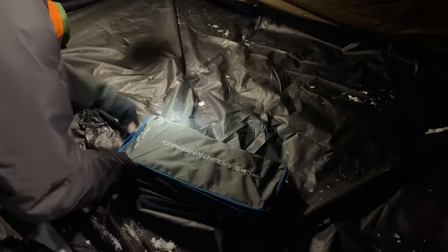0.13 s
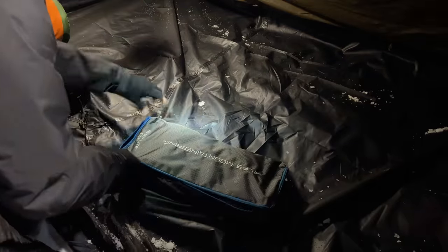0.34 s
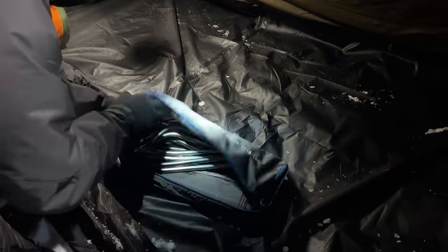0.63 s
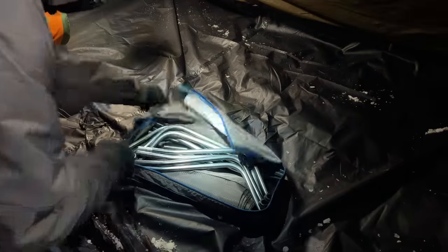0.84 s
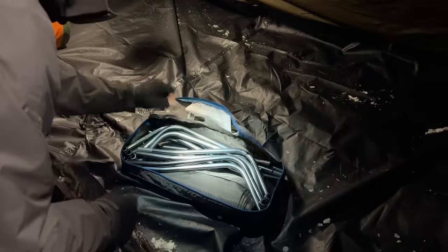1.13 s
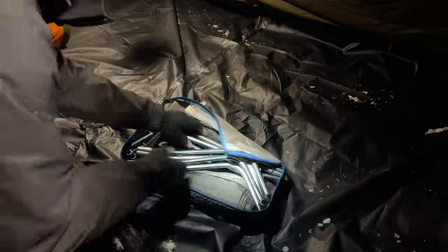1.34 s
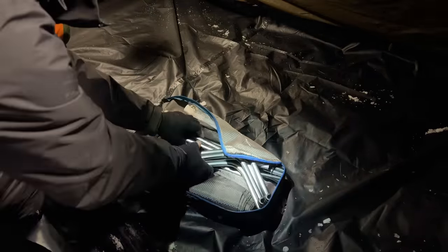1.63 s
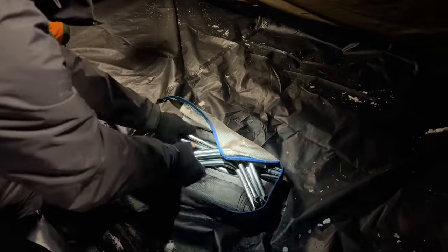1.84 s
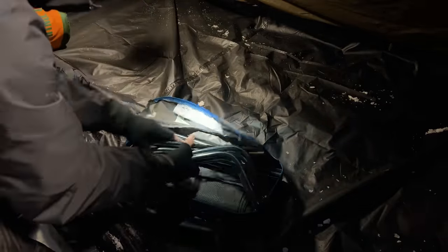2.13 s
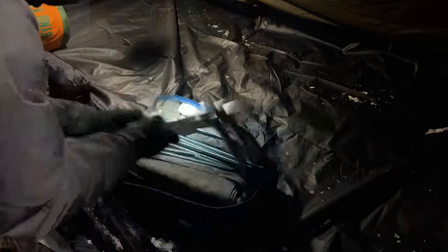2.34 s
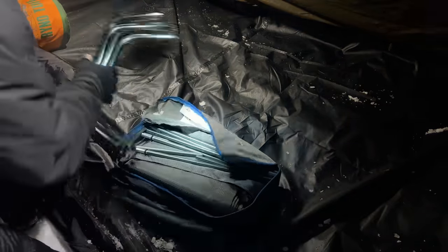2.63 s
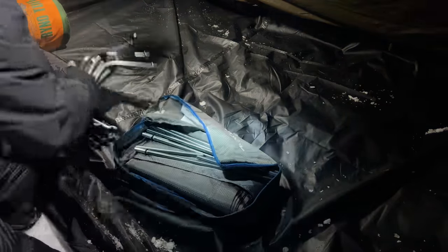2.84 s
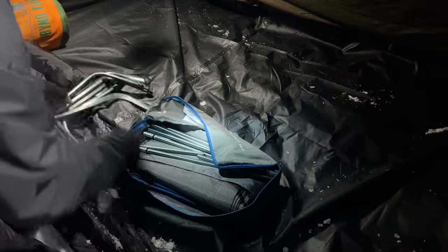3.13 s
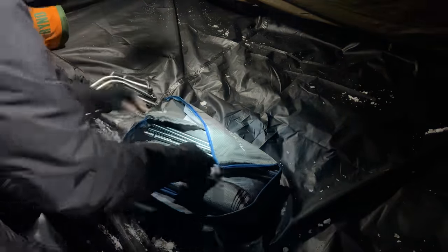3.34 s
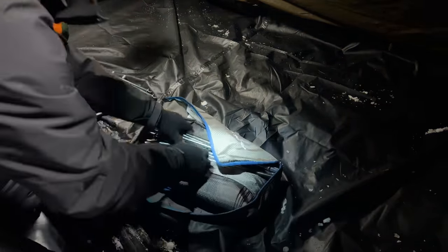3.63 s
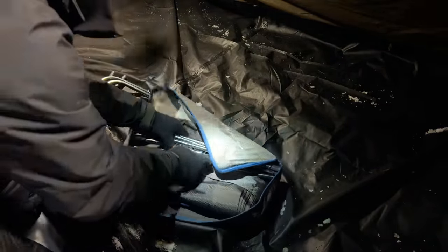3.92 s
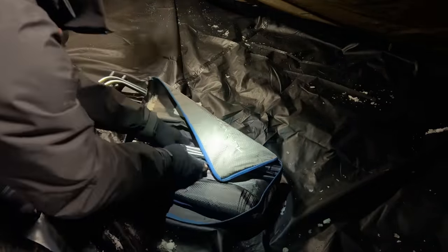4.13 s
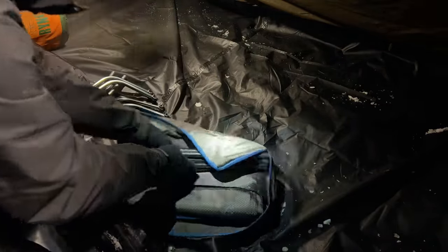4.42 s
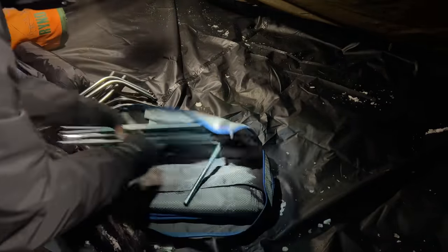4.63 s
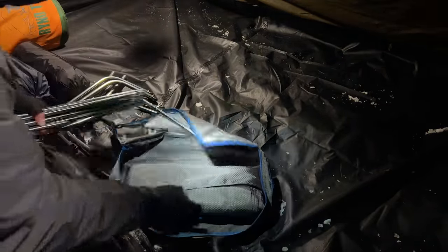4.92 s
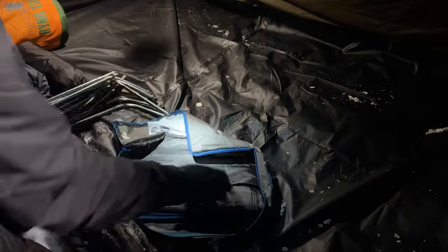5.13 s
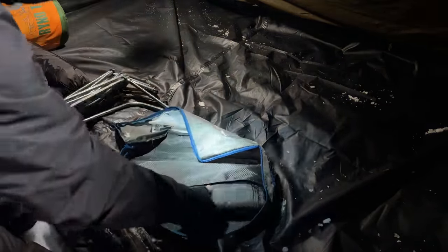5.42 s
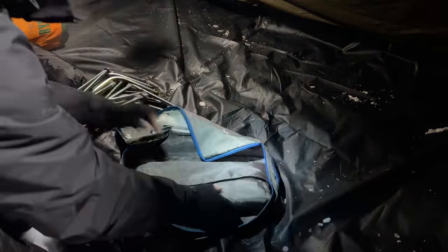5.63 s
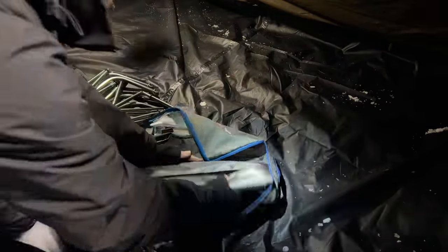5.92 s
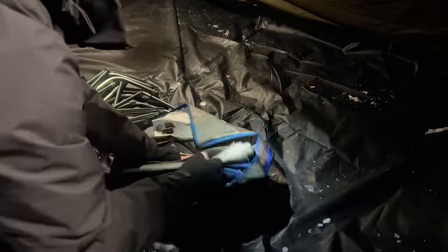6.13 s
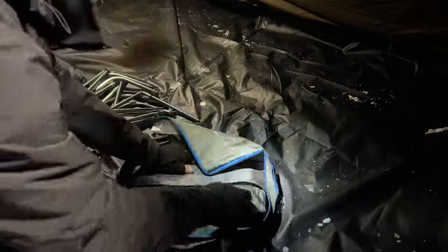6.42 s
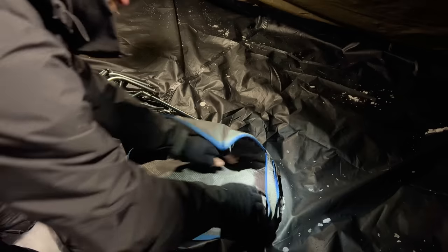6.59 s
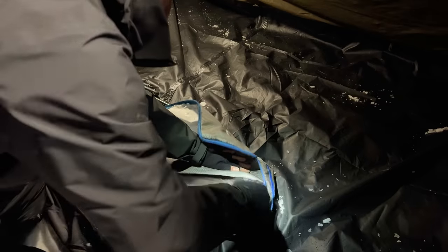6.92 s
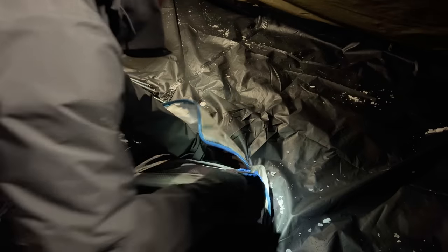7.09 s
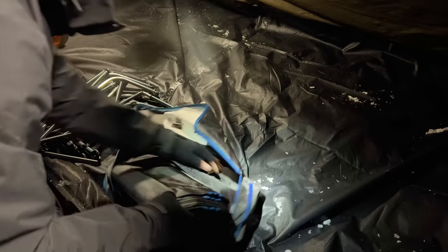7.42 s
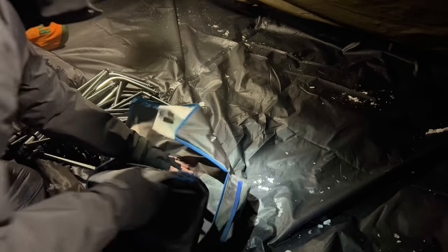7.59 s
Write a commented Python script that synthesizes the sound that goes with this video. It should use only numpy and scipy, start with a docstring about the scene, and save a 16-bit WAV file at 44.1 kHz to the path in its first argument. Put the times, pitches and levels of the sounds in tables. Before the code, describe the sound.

Close, dry handling of camping gear inside a tent. A brief zippy sleeve swish and nylon rustle, a bag flap snapping open, then bent metal poles clattering in a bright cluster. Straight poles follow with sharper clinks and short scraping slides. Finally the stiff fabric bag is crumpled, crackling louder and louder to the end. Faint low air and soft groundsheet thumps lie underneath.

```python
"""Gathering tent poles

Someone in a nylon jacket kneels on a groundsheet, opens a fabric bag and gathers metal tent poles from it.
Cloth is friction noise plus buckling creases; a swishing sleeve is a tone at the rate its ribs pass.
Bent poles, then straight ones, clatter as contact noise plus decaying bending modes; stiff cloth crackles.
A phone close by colours the sound and limits the loudest clinks.
"""
import sys
import numpy as np
from scipy import signal
from scipy.fft import rfft, irfft
from scipy.io import wavfile
from scipy.ndimage import uniform_filter1d, minimum_filter1d

SR = 44100
rng = np.random.default_rng(int(sys.argv[2]) if len(sys.argv) > 2 else 0)


def master_out(mix):
    """Clip the mix to full scale and print it as 16-bit PCM to the path in sys.argv[1]."""
    frames = np.transpose(np.atleast_2d(mix))
    ceiling = np.clip(frames, -1, 1)
    pcm = np.round(ceiling * 32767).astype(np.int16)
    wavfile.write(sys.argv[1], SR, pcm)


N = 341775
TIME = np.arange(N) / SR  # s


def undb(db):
    """Level law: decibels to amplitude gain."""
    return 10 ** (np.asarray(db) / 20)


def unit(x, size=None):
    """Normalisation: scale to rms 1 over the first size samples."""
    return x / np.sqrt(np.mean(x[:size] ** 2) + 1e-18)


def add(track, s, sound):
    """Superposition: mix a sound in at time s."""
    i = max(int(s * SR), 0)
    track[i:i + len(sound)] += sound[:max(N - i, 0)]


def band(x, lo_hz, hi_hz, order=2):
    """Resonant selection: a causal band-pass, its upper edge kept below half the sample rate."""
    edges = [lo_hz, min(hi_hz, .48 * SR)]
    return signal.sosfilt(signal.butter(order, edges, "band", fs=SR, output="sos"), x)


def response(points, size=1024):
    """Minimum phase: the causal impulse response of a (Hz, dB) colour, by way of the cepstrum."""
    hz, db = np.transpose(points)
    grid = np.arange(size // 2 + 1) * SR / size + 1  # 1 Hz up, to keep the logarithm finite
    cepstrum = irfft(np.log(undb(np.interp(np.log(grid), np.log(hz), db))))
    # fold the backward half onto the forward half
    cepstrum[1:size // 2] *= 2
    cepstrum[size // 2 + 1:] = 0
    return irfft(np.exp(rfft(cepstrum)))


def colour(x, points):
    """Spectral shaping: colour white sound and keep its power."""
    h = response(points)
    return signal.fftconvolve(x, h / np.sqrt(np.sum(h ** 2)))[:len(x)]


def walk(rate):
    """Random modulation: smooth chance of rms 1 that changes rate times a second."""
    k = max(int(SR / rate), 1)
    steps = np.repeat(rng.standard_normal(N // k + 1), k)
    return unit(uniform_filter1d(steps, k)[:N])


def speckled(size, spread_db, width_hz):
    """Modal crowding: noise with chance resonances, the many weak modes one point of contact wakes."""
    hz = np.arange(size // 2 + 1) * SR / size
    peaks_db = spread_db * np.interp(hz / width_hz, np.arange(600), rng.standard_normal(600))
    return unit(irfft(undb(peaks_db) * np.exp(2j * np.pi * rng.random(len(hz)))))


def buckles(rate, spread_db):
    """Buckling: tiny creases give way at random, with many weak clicks and a few strong ones."""
    size = undb(spread_db * np.minimum(rng.exponential(size=N), 4))
    clicks = (rng.random(N) < rate / SR) * size * rng.choice([-1, 1], N)
    return clicks / np.sqrt(uniform_filter1d(clicks ** 2, size=3000) + 1e-9)  # even out the local power


STROKE_RANGE_DB = 20.5  # a movement falls this far (dB) over its rise and fall times
STROKE_SHAPE = 1.28  # exponent; above 1 its top is rounder


def swell(peak_s, rise_s, fall_s):
    """Energy envelope: the power of one movement builds up to its peak and dies away."""
    coarse = TIME[::32]
    before = (peak_s - coarse) / max(rise_s, .005)
    after = (coarse - peak_s) / max(fall_s, .005)
    away = np.maximum(before, after)
    return np.interp(TIME, coarse, undb(-STROKE_RANGE_DB * away ** STROKE_SHAPE) ** 2)


# Colour of the still air. Each row: frequency in Hz, density in dB per Hz (relative).
AIR = [(25, 6), (80, 8.5), (300, -1), (1000, -42), (4000, -10), (16000, -11)]


def air(level_db=-51.5):
    """Stationary noise: the still air is a steady, coloured random sound."""
    return undb(level_db) * colour(rng.standard_normal(N), AIR)


# Knees and bag shift their weight on the groundsheet.
# Each row: peak in seconds, rise in seconds, fall in seconds, level in dB before the gain in ground().
SHIFTS = [(.02, .1, .15, -39), (.28, 0.13, 0.13, -42.5), (.56, 0.16, 0.24, -34.5), (1.35, .1, .2, -45),
          (1.81, .2, 0.75, -44.5), (2.76, 0.19, 0.27, -50), (3.15, .1, 0.18, -48.5),
          (3.64, 0.41, 0.43, -44), (4.51, .4, 0.83, -50.5), (5.4, .3, 0.66, -52), (5.78, 0.24, .15, -43),
          (6.69, .2, 0.39, -50), (7.059, .2, 0.27, -47.5)]


def ground(gain_db=-1, rest_db=-62):
    """Friction under load: the sheet rumbles dully as weight moves over it."""
    power = undb(rest_db) ** 2
    for peak_s, rise_s, fall_s, db in SHIFTS:
        power = power + undb(db) ** 2 * swell(peak_s, rise_s, fall_s)
    rumble = unit(band(rng.standard_normal(N), 35, 141))
    return rumble * np.sqrt(power) * undb(gain_db)


# Dull bumps of hands and bag, and a few higher knocks near 1 kHz.
# Each row: start in seconds, tuning of the resonance in Hz, level in dB.
BUMPS = [(.075, 299, -34), (.2, 317, -40.5), (0.207, 130, -33), (0.268, 107, -33), (1.275, 300, -36),
         (2.241, 328, -30), (2.781, 170, -38), (3.002, 430, -32.5), (3.165, 202, -35), (3.684, 268.6, -28),
         (3.689, 100.5, -40), (4.021, 358, -29), (4.121, 410, -36), (4.462, 168, -38), (4.757, 1115, -51),
         (3.836, 955, -30.5), (4.863, 932, -29), (5.775, 427, -26.5), (6.139, 334, -28),
         (6.654, 295.5, -28)]


def bumps(decay_s=0.0029):
    """Damped resonance: blows give a few cycles of a broad band."""
    out, t = np.zeros(N), TIME[:5000]
    for s, hz, db in BUMPS:
        push = rng.standard_normal(len(t)) * np.exp(-t / decay_s)
        add(out, s, undb(db) * unit(band(push, hz / 2.08, hz * 1.36), size=700))
    return out


# Light stirring of jacket and bag between the strokes, with pauses.
# Each row: time in seconds, low rubbing in dB, high crinkling in dB.
STIR = [(0, -44, -57.5), (.24, -49.5, -57), (.28, -45, -42), (1.07, -47.5, -43), (1.15, -53.5, -61),
        (1.3, -42, -44.5), (1.999, -45, -36.5), (2.88, -48, -49), (3.049, -43.5, -40.5),
        (3.7, -44.5, -31.5), (4.151, -45, -42), (4.62, -39.5, -36), (4.811, -52.5, -55.5),
        (4.921, -45.5, -43), (5.6, -45.5, -36), (6.35, -42.5, -42), (7.45, -39, -35.5), (7.75, -31, -30.5)]
# Strokes of an arm or of pulled cloth. Each row: peak in seconds, rise in seconds, fall in seconds,
# low rubbing in dB, high crinkling in dB.
STROKES = [(.1, 0.12, 0.11, -26.5, -37.5), (.195, 0.16, 0.028, -42.5, -29.5), (.42, 0.063, 0.025, -38, -37),
           (.6, .1, .25, -48.5, -45.5), (.82, 0.11, 0.21, -31, -38.5), (.89, 0.11, .13, -49, -32.5),
           (1.44, 0.07, 0.12, -35.5, -30), (1.98, 0.21, 0.091, -44, -38.5), (2.25, 0.088, .1, -35.5, -43),
           (2.7, 0.31, 0.22, -59, -34.5), (2.96, 0.013, 0.23, -40.5, -33.5), (3.62, 0.38, 0.15, -34.5, -48),
           (3.84, .12, .08, -32, -48), (4.272, 0.053, 0.14, -38, -23), (4.51, 0.31, 0.091, -38.5, -34.5),
           (4.871, 0.017, 0.11, -33.5, -33), (4.98, 0.16, 0.45, -43, -39), (5.79, 0.067, 0.073, -31.5, -33),
           (6.021, 0.089, 0.2, -35.5, -28), (6.13, 0.073, .06, -38.5, -30), (6.259, 0.11, 0.03, -29.5, -30),
           (6.53, 0.24, 0.25, -38.5, -35.5), (6.71, 0.044, 0.11, -31.5, -28), (6.8, 0.1, 0.14, -35, -31.5),
           (6.945, 0.075, 0.35, -24, -24), (7.08, 0.26, 0.19, -23.5, -22), (7.18, 0.066, 0.059, -25, -27.5),
           (7.3, 0.1, .25, -33.5, -30.5), (7.53, 0.056, 0.29, -23, -23.5), (7.651, 0.07, 0.076, -17, -15)]


def handling():
    """Power addition: strokes on top of the light stirring set the amplitude of rubbing and crinkling."""
    s, rub_db, crinkle_db = np.transpose(STIR)
    power = undb([np.interp(TIME, s, rub_db), np.interp(TIME, s, crinkle_db)]) ** 2
    for peak_s, rise_s, fall_s, *db in STROKES:
        power = power + undb(db)[:, None] ** 2 * swell(peak_s, rise_s, fall_s)
    return np.sqrt(power)


def folds(lo_hz, hi_hz, rate, spread_db, patchy_db, count):
    """Independent sources: each fold of the cloth crackles in its own band and swells by itself."""
    total = np.zeros(N)
    for hz in np.geomspace(lo_hz, hi_hz, count):
        patchy = undb(patchy_db * walk(28))
        crackle = band(buckles(rate, spread_db), hz / 1.21, hz * 1.225)
        total += patchy * crackle / np.sqrt(hz)  # wider bands pass more power
    return unit(total)


# Colours of soft rubbing and stiff crinkling, also used by snaps().
# Each row: frequency in Hz, density in dB per Hz (relative).
RUB = [(25, -29), (70, -2.5), (150, 0.5), (350, 2), (700, 2), (1200, 0.5), (1800, -2.5), (3000, -5),
       (8000, -77.5)]
CRINKLE = [(200, -15.5), (900, -9), (1500, -10), (2000, -13.5), (2600, 1), (3400, -3.5), (5000, -7),
           (8000, -7.5), (13000, -5.5), (16000, -8.5)]


def cloth(motion, slide_db=-3, crease_db=-3, flicker_db=1.65, soft_db=-3, stiff_db=-3):
    """Friction and buckling: creases give way over sliding noise; soft folds rumble, stiff ones crackle."""
    creases = buckles(rate=900, spread_db=4.5)
    grip = undb(flicker_db * walk(80))  # the cloth catches and lets go
    rub = colour(creases + undb(slide_db) * rng.standard_normal(N), RUB)
    # creases are too soft to reach the top, where the weave only hisses
    dull_creases = undb(crease_db) * band(creases, 260, 3400, order=1)
    crinkle = colour(dull_creases + rng.standard_normal(N), CRINKLE)
    soft = folds(lo_hz=170, hi_hz=1307, rate=250, spread_db=2.0, patchy_db=6.5, count=7)
    stiff = folds(lo_hz=1840, hi_hz=2630, rate=260, spread_db=5.0, patchy_db=2.0, count=4)
    low = unit(grip * (unit(rub) + undb(soft_db) * soft))
    high = unit(grip * (unit(crinkle) + undb(stiff_db) * stiff))
    return low * motion[0] + high * motion[1]


def small_snaps(motion, count=200, rate=16, level_db=(-0.5, -4.5), spread_db=1):
    """Random arrivals: lesser creases flip more often and harder the harder cloth is pulled; rows like SNAPS."""
    due = np.cumsum(motion[0] / motion[0].mean()) * rate / SR  # mean rate in snaps per second
    samples = np.searchsorted(due, np.cumsum(rng.exponential(size=count)))
    scatter_db = spread_db * rng.standard_normal((count, 2))
    rows = []
    for i, db in zip(samples, scatter_db):
        if i < N:
            low, high = 20 * np.log10(motion[:, i]) + level_db + db  # relative to the moving cloth
            rows.append((TIME[i], low, high))
    return rows


# Large creases that snap through.
# Each row: start in seconds, low level in dB before low_db in snaps(), high level in dB.
SNAPS = [(.0347, -36.5, -52), (0.2708, -30, -30), (.2997, -46, -32), (.4221, -37, -32), (0.56, -31.5, -47),
         (0.7505, -21.5, -28), (0.8229, -18, -36), (0.8504, -25, -51.5), (0.8701, -22.5, -45),
         (.9018, -19, -29), (.9313, -52, -29.5), (1.2412, -35, -49), (2.4354, -28, -31), (4.6207, -29, -39),
         (4.7636, -34.5, -42), (4.863, -29, -35), (4.9322, -50, -28), (5.9936, -24, -30.5),
         (6.022, -21, -30), (6.0536, -42, -24), (6.1267, -26.5, -30.5), (6.1813, -26.5, -33),
         (6.25, -26.5, -26.5), (6.6542, -16.5, -34), (6.687, -19.5, -29), (6.7354, -28.5, -35),
         (6.7675, -27, -45), (6.9604, -35, -36.5), (6.9978, -18, -40), (7.094, -24, -32),
         (7.1622, -24.5, -27.5), (7.5324, -27, -24.5), (7.5591, -13, -20), (7.582, -13.5, -24.5),
         (7.625, -16, -25), (7.6572, -11, -34)]


def snaps(motion, flutter_s=0.0044, flutter_db=-20, low_db=-1):
    """Snap-through: a crease flips with one sharp crack, and the sheet flutters for a moment."""
    out, t = np.zeros(N), TIME[:2048]
    for s, low, high in SNAPS + small_snaps(motion):
        flutter = speckled(size=2048, spread_db=5.0, width_hz=1200) * np.exp(-t / flutter_s)
        crack = (t == 0) + undb(flutter_db) * flutter
        thud = undb(low + low_db) * unit(colour(crack, RUB), size=176)
        snap = undb(high) * unit(colour(crack, CRINKLE), size=176)
        add(out, s, thud + snap)
    return out


# The ribbed weave of a sleeve slides over itself.
# Each row: time in seconds, mean ribs per second in Hz, relative level in dB.
SWISH = [(0.052, 523.6, -55), (0.091, 564.6, -37), (0.121, 610, -27.5), (0.148, 655, -24),
         (0.169, 729, -21), (0.185, 766, -21.5), (0.199, 950, -31), (0.21, 880, -26.5), (.222, 810, -68)]
# Overtones of the weave before its radiation band. Each row: multiple of the rib rate, level in dB.
WEAVE = [(1, 3), (2, 0.5), (3, 4), (4, 1), (5, -13)]


def swish(scatter=0.0412, rasp_db=-7, hiss_db=-14.0, rough_db=2):
    """Periodic excitation: ribs tick past each other, so pitch follows the unsteady speed of the arm."""
    s, hz, db = np.transpose(SWISH)
    speed = np.interp(TIME, s, hz) * (1 + scatter * walk(600))
    phase = 2 * np.pi * np.cumsum(speed) / SR
    tone = sum(undb(gain) * np.sin(round(k) * phase + rng.uniform(0, 2 * np.pi)) for k, gain in WEAVE)
    rasp = rng.standard_normal(N) * (1 + np.cos(phase))
    # the sleeve radiates best near 1 kHz
    voice = unit(band(tone, 830, 1280, order=1))
    voice = voice + undb(rasp_db) * unit(band(rasp, 1020, 1200, order=1))
    voice = voice + undb(hiss_db) * unit(band(rasp, 9500, 14000, order=1))  # single fibres hiss
    uneven_grip_db = rough_db * walk(300)
    return voice * undb(uneven_grip_db + np.interp(TIME, s, db)) * (TIME < s[-1])


# Straight poles slide along each other.
# Each row: start in seconds, length in seconds, level in dB of the ringing part.
SLIDES = [(3.374, 0.12, -56), (4.279, 0.022, -31.5), (5.157, 0.13, -34), (5.407, 0.039, -21),
          (5.487, 0.17, -35.5), (5.635, 0.055, -29)]
# Bending modes of the straight tubes, also struck by poles().
# Each row: frequency in Hz, level in dB (relative), t60 in seconds (for blows only).
STRAIGHT_MODES = [(2250, -8, .08), (2900, -6, .07), (3250, -2, .085), (3560, -1, .095), (4900, -1, .1),
                  (5600, -4, .08), (6750, 1, .11), (7100, -2, .1), (8800, 0, .12), (9250, -6, .08),
                  (10850, -1, .11), (13150, -4, .1), (15350, -12, .07)]


def slides(attack_s=0.0086, release_s=0.024, width_hz=130, scrape_db=-5, rough_db=6.0):
    """Stick-slip: tube catches on tube in a dense run of tiny slips that keep the bending modes ringing."""
    slips = buckles(rate=2500, spread_db=1) * undb(rough_db * walk(150))
    ring, pressure = np.zeros(N), np.zeros(N)
    for hz, db, _ in STRAIGHT_MODES:
        ring += undb(db) * band(slips, hz - width_hz / 2, hz + width_hz / 2, order=1)
    for s, length, db in SLIDES:
        press = np.clip((TIME - s) / attack_s, 0, 1)
        let_go = np.exp(-np.maximum(TIME - s - length, 0) / release_s)
        pressure += undb(db) * press * let_go
    scrape = unit(band(slips, 3600, 6800))
    return pressure * (unit(ring) + undb(scrape_db) * scrape)


# Poles knock together: bent ones, straight ones, and one loose tube that drops on the pile.
# Each row: start in seconds, level in dB at 2-4 kHz before the set's gain_db, low knock in dB re that level,
# hardness as extra treble in dB.
BENT_HITS = [(1.266, -34.5, -9, -6), (1.274, -29.5, -1.5, -6), (1.285, -29, -6, 2.5), (1.418, -24, -10, 2),
             (1.447, -32, -2.5, -11), (1.468, -33, -2.5, -4.5), (1.482, -20, -7, 1.5),
             (1.532, -36.5, -1.5, -1.5), (1.546, -30, -3.5, -12), (1.632, -34, -0.5, -1.5),
             (1.659, -26.5, 0.5, -2), (1.669, -26.5, -22, -2.5), (1.788, -33, -5, -2.5),
             (1.802, -31.5, -2.5, -5), (1.829, -37.5, 4, -2.5), (1.905, -30, -17, -2.5),
             (1.941, -26.5, -21.5, -4), (1.947, -33.5, 6.5, 0), (1.974, -32, 4.5, 1.5),
             (2.018, -27, -2.5, 0), (2.031, -32.5, 6, 5.5), (2.036, -24.5, -15, 3), (2.062, -41, -1, -5),
             (2.09, -34.5, -17, 0.5), (2.129, -44, 1, -3), (2.171, -24.5, -10, -8), (2.184, -38.5, -10, -1),
             (2.213, -32.5, -18.5, -9), (2.225, -32, -5, -8), (2.23, -23.5, -7.5, 0.5),
             (2.282, -23.5, -17, 0.5), (2.307, -39.5, -10, 6), (2.351, -31.5, -21.5, -8.5),
             (2.385, -36.5, -16, -3.5), (2.444, -37, -9, 0), (2.467, -41.5, -8, -6), (2.53, -25, -22.5, 1),
             (2.559, -35, -19, -3), (2.601, -37, -21, 2.5), (2.627, -32, -3, 7.5), (2.659, -30, -10, -5),
             (2.675, -42, 2, -8), (2.709, -35, -20, -6), (2.737, -23, -20, 3), (2.839, -44.5, -3, -2),
             (2.896, -47, -1.5, -0.5), (2.955, -32, -6, -1.5), (2.975, -22.5, -15, 1),
             (2.993, -29.5, -11, 3.5), (3.014, -26, -7, 4), (3.039, -30.5, -16, 1), (3.072, -36.5, -9.5, 6),
             (3.112, -31, -13, 2), (3.126, -31.5, -5.5, -1), (3.139, -30, -2.5, 0.5),
             (3.155, -26.5, -11, 2.5), (3.164, -18, -22, 3.5), (3.179, -27.5, -21, 5.5),
             (3.223, -35, -21, -8)]
STRAIGHT_HITS = [(3.3, -25, -6.5, 7), (3.341, -33, -3, 1), (3.354, -29.5, -5, 5.5), (3.412, -30, -25, 7),
                 (3.453, -27, -27, -7), (3.468, -28, -5, 6), (3.565, -30.5, -2, -3), (3.652, -28.5, 0, -12),
                 (3.659, -25, -5, 1.5), (3.685, -31.5, 4, 7), (3.825, -35.5, -8, 1), (3.93, -20.5, 1, 3.5),
                 (3.979, -35.5, 10, 2), (3.985, -18, -24, -14.5), (3.996, -31, -1, 0.5),
                 (4.266, -32, -1, 0), (4.275, -23.5, -7, 2), (4.311, -28.5, 5, 2.5), (4.388, -39, 6, 4),
                 (4.415, -32, -20, 1), (4.457, -30.5, -5, -2), (4.473, -44, 13.5, -6),
                 (4.513, -31.5, 7, 12), (4.534, -32, 3, 5.5), (4.662, -42.5, -1, -2.5),
                 (4.884, -37.5, 2, 2), (4.919, -41.5, -11, -0.5), (4.947, -42, 4.5, 5),
                 (5.028, -46, 9.5, -9), (5.065, -39.5, -3, 3.5), (5.137, -24.5, -8.5, 5),
                 (5.147, -20, -19.5, 1.5), (5.16, -26, -18, 1), (5.19, -23.5, -19.5, 0.5),
                 (5.204, -29, -17, 9), (5.275, -26.5, -5, 9), (5.321, -39, -19, 1), (5.34, -33.5, -18, 1),
                 (5.367, -39, 2, 8), (5.396, -22.5, -12, 6), (5.42, -32, -18, 7.5), (5.447, -25, -16, 4),
                 (5.465, -26.5, -24, 6.5), (5.51, -37.5, -15.5, -1.5), (5.519, -29.5, -17, 2),
                 (5.576, -26.5, -28.5, 6), (5.623, -29, -19, 6), (5.698, -35.5, -3, 9.5),
                 (5.877, -40, -13.5, 0.5)]
LOOSE_HIT = [(5.791, -25, -15.5, 15)]
# Bending modes of the bent tubes and of the loose one, which rings more freely.
# Each row: frequency in Hz before mistuning, level in dB (relative), t60 in seconds.
BENT_MODES = [(2100, -8, .07), (2750, -4, .07), (3100, -1, .075), (3520, 0, .08), (4800, -1, .085),
              (5650, -5, .07), (6750, -2, .085), (8500, -7, .07), (11950, -4, .075), (12700, -9, .07),
              (15250, -11, .06)]
LOOSE_MODES = [(3410, -15, 0.49), (3630, -13, 0.057), (5030, -23.5, .1), (6300, 0, 0.069), (6740, 8, 0.084),
               (8750, 9, 0.093), (10880, 17, 0.07), (13300, 17, 0.089), (15500, -11, .07)]
TREBLE_DB = 2.5  # 4-9 kHz level of a blow of hardness 0, re its 2-4 kHz level
TOP_PER_HARDNESS = 1.59  # the top above it grows faster with hardness (dB per dB)
CHATTER_DOUBLES_DB = 20  # this much more hardness makes a blow chatter twice as long


def poles(hits, modes, ring_db, chatter_s, rattle_t60, rattle_db, mistune, gain_db, top_db, tick_db=7):
    """Modal excitation: tubes tick, chatter and ring; each blow finds other, slightly mistuned neighbours."""
    out, t = np.zeros(N), TIME[:9000]
    hz, db, t60 = np.repeat(np.array(modes, float), 4, axis=0).T  # four neighbours to a mode
    fading = (undb(db)[:, None] * np.exp(-np.log(1000) * t / t60[:, None])).astype(np.float32)
    tick = undb(tick_db) * np.exp(-t / 0.000091)
    for s, level, knock, hardness in hits:
        # the blow dies fast, the many weak modes of the whole bundle more slowly
        stretch = 2 ** (hardness / CHATTER_DOUBLES_DB)
        chatter = np.exp(-t / (chatter_s * stretch))
        rattle = undb(rattle_db) * np.exp(-np.log(1000) * t / (rattle_t60 * stretch))
        bounces = undb(0.51 * np.repeat(rng.standard_normal(len(t)), 80)[:len(t)])
        crowd = speckled(size=9000, spread_db=3.5, width_hz=260)
        contact = unit(crowd * bounces * (tick + chatter + rattle), size=441)

        detune, strength, phase = rng.standard_normal((3, len(hz)))
        cycles = np.outer(hz * (1 + mistune * detune), t) + phase[:, None]
        tubes = np.sin((2 * np.pi * cycles).astype(np.float32))
        ring = unit(undb(5.8 * strength) @ (fading * tubes), size=441)
        blow = contact + undb(ring_db) * ring

        # soft contacts knock low, hard ones reach the top
        low = band(contact, 1070, 3120) + undb(-7.5) * band(contact, 237, 440)
        parts = [(knock, low),
                 (0, band(blow, 2013, 3640)),
                 (TREBLE_DB + hardness, band(blow, 4270, 8770, order=3)),
                 (top_db + TOP_PER_HARDNESS * hardness, band(blow, 7530, SR / 2, order=3))]
        total = sum(undb(part_db) * unit(part, size=441) for part_db, part in parts)
        add(out, s, undb(level + gain_db) * total)
    return out


def scene():
    """Superposition: air, ground, cloth and poles add up; the tent gives no echo."""
    bent = poles(BENT_HITS, BENT_MODES, ring_db=-11.5, chatter_s=0.0014, rattle_t60=0.075, rattle_db=1.0,
                 mistune=0.0318, gain_db=4, top_db=-0.5)
    straight = poles(STRAIGHT_HITS, STRAIGHT_MODES, ring_db=-9.5, chatter_s=0.0058, rattle_t60=0.17,
                     rattle_db=-18, mistune=0.0156, gain_db=4, top_db=-3.5)
    loose = poles(LOOSE_HIT, LOOSE_MODES, ring_db=5.5, chatter_s=0.0046, rattle_t60=0.099, rattle_db=-7,
                  mistune=0.0082, gain_db=-1.0, top_db=-5.5)
    motion = handling()
    background = air() + ground() + bumps()
    fabric = cloth(motion) + snaps(motion) + swish()
    return (background + fabric + slides() + bent + straight + loose)[None]


# Colour of the microphone. Each row: frequency in Hz, gain in dB.
MICROPHONE = [(30, -5), (130, -4.5), (300, -3), (1600, -1), (2600, -1.5), (3450, 6.5), (3800, 4),
              (4150, -3), (5000, 1), (16000, -7)]
TOP_HZ = 15800  # the top is cut above this


def record(dry):
    """Port resonance and limiting: a peak near 3.5 kHz, a fast limiter on the peaks, and a cut top."""
    heard = signal.fftconvolve(dry, response(MICROPHONE)[None])[:, :N]
    ceiling, hold = .78, 61  # full scale is 1; hold in samples
    needed = ceiling / np.maximum(np.abs(heard), ceiling)
    gain = uniform_filter1d(minimum_filter1d(needed, hold), hold)
    return signal.sosfilt(signal.ellip(10, .2, 70, TOP_HZ, fs=SR, output="sos"), heard * gain)


dry = scene()
out = record(dry)
master_out(out)
```